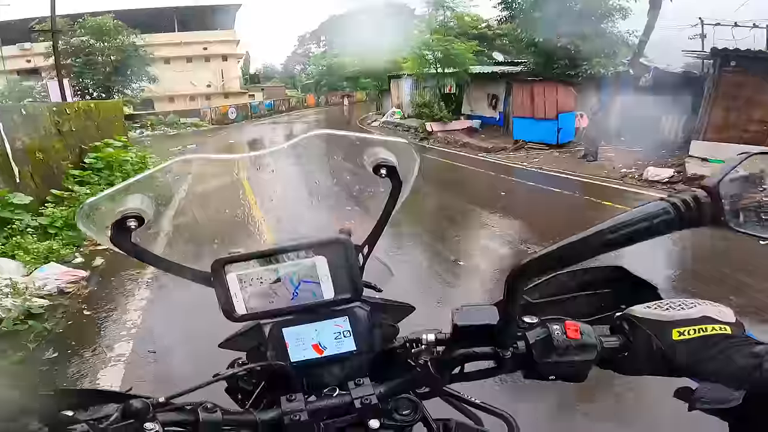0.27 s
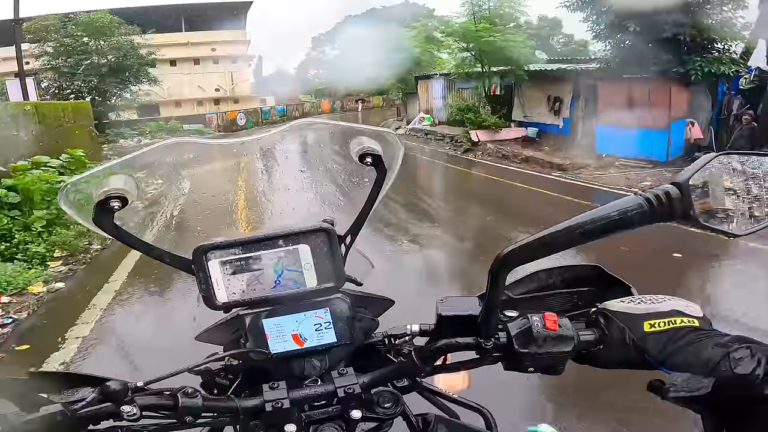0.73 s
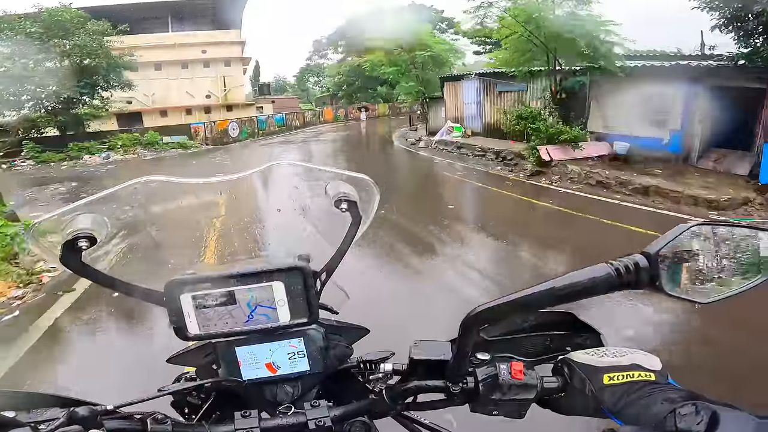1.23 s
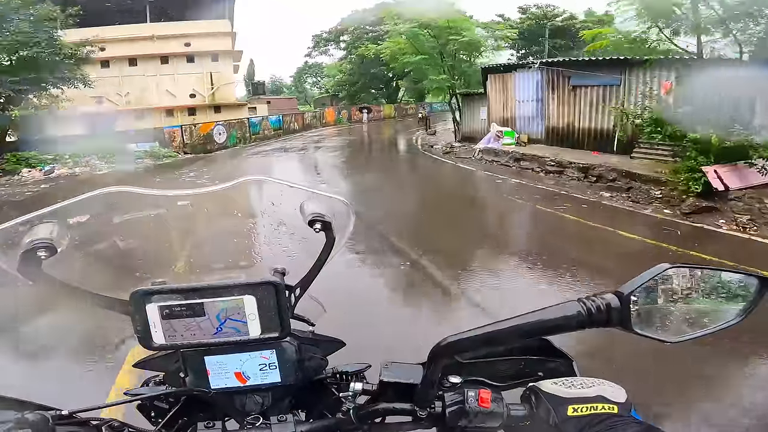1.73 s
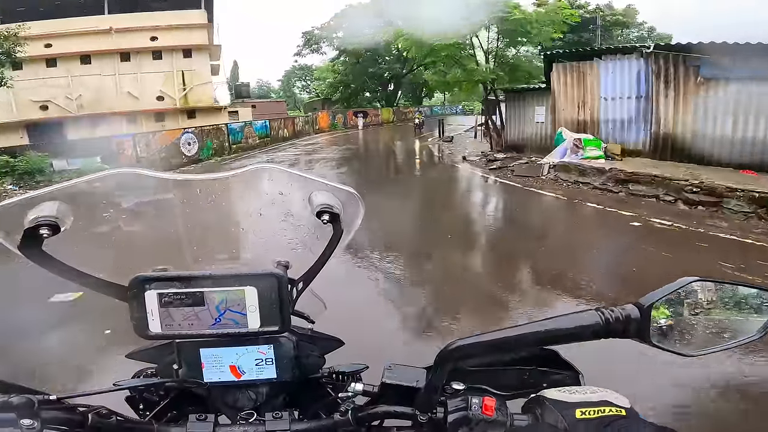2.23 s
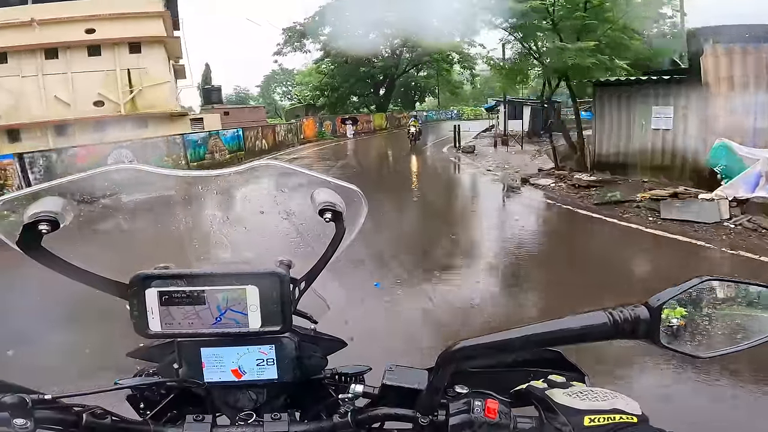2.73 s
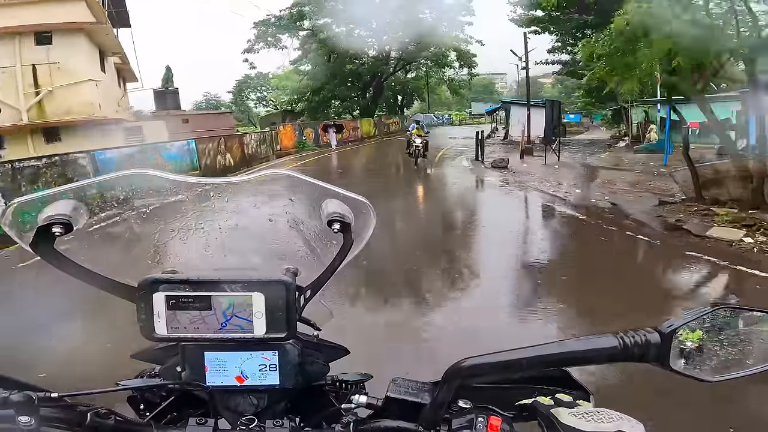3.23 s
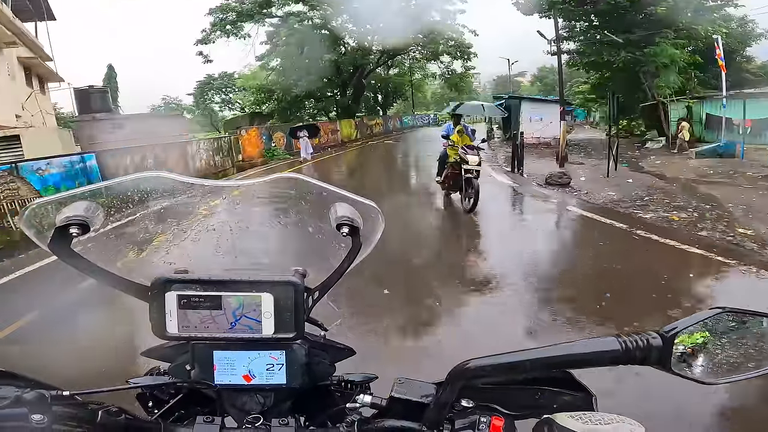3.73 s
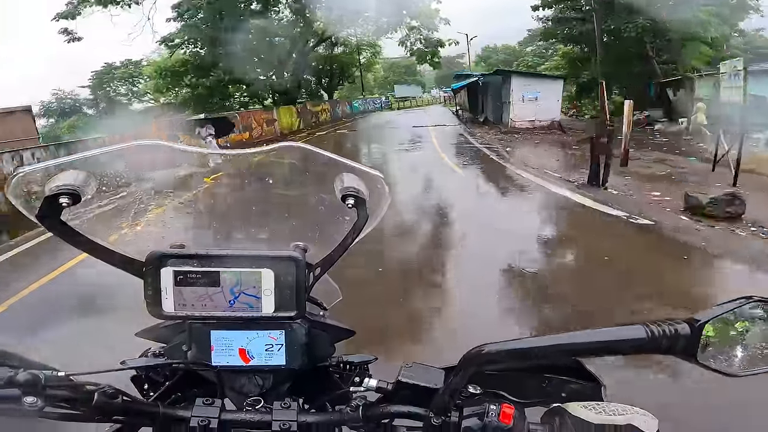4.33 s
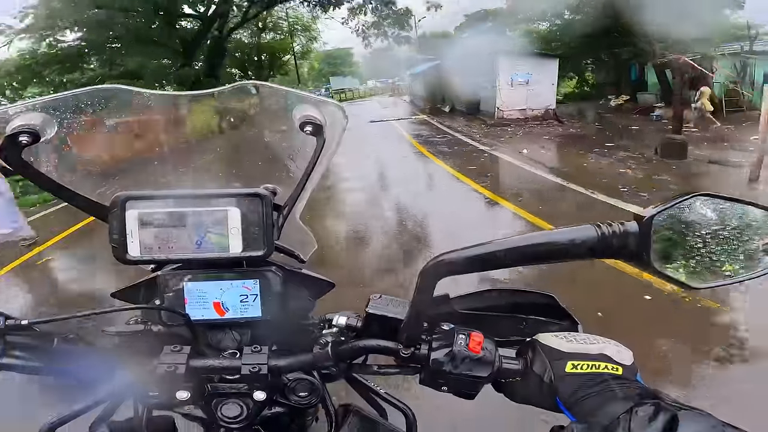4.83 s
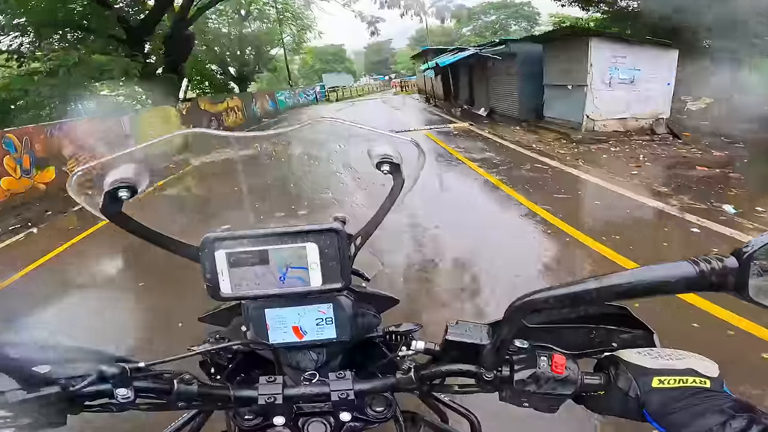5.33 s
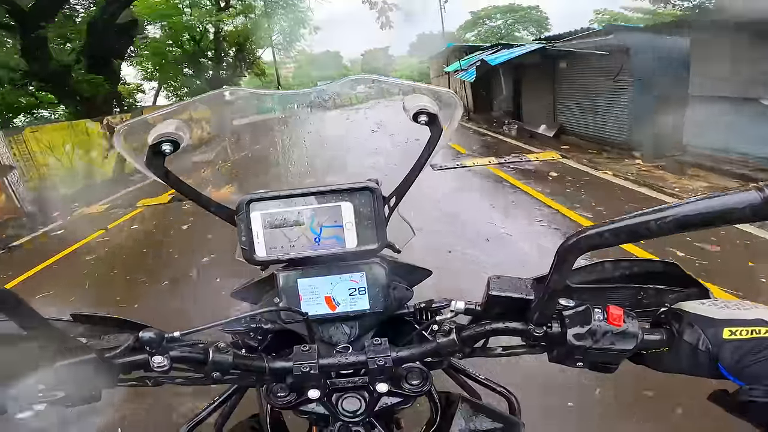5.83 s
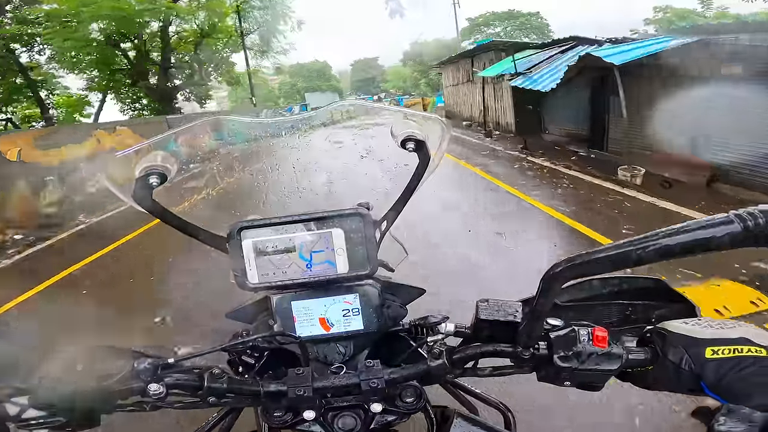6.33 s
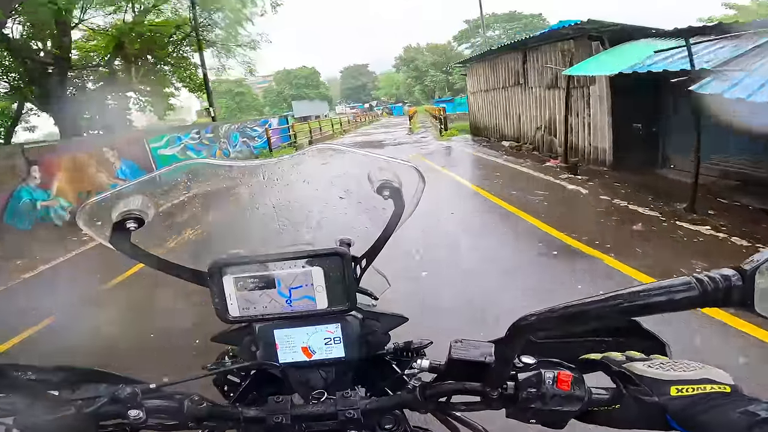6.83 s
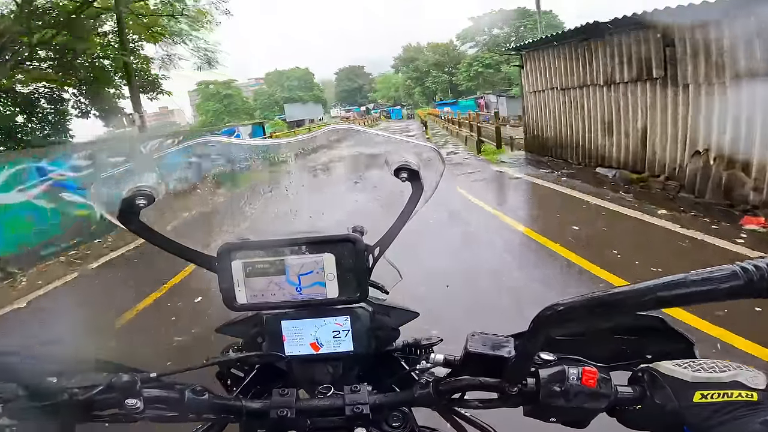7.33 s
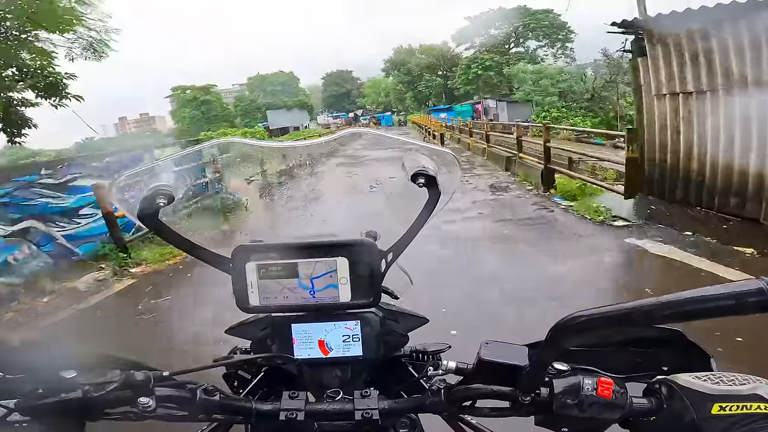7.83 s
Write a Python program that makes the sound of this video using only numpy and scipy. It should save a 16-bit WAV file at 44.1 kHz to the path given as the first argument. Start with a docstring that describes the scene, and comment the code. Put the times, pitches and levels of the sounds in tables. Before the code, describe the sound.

Buffeting wind and a low throbbing motorcycle engine dominate, with sharp raindrop taps, thin wet tyre spray and brief throttle growls.

```python
"""A motorcycle ride in light rain

A single-cylinder motorcycle rides at town speed along a wet road, heard from the rider's chest.
Wind is shaped noise in gusts, with booming sines for thumps in the microphone port; the engine is noise
and firing kicks through resonances, with clatter and throttle growl. The tyres are hissing noise and tiny
clicks; raindrops and a rumble strip are clicks that set small parts ringing."""
import sys
import numpy as np
from scipy import signal
from scipy.fft import rfft, irfft, next_fast_len
from scipy.io import wavfile
from scipy.ndimage import uniform_filter1d

SR = 44100
rng = np.random.default_rng(int(sys.argv[2]) if len(sys.argv) > 2 else 0)


def dump_mix(stems):
    """Bounce the given channels to the path in sys.argv[1] as a 16-bit WAV at rate SR."""
    frames = np.atleast_2d(stems).T  # one column per channel
    limited = np.clip(frames, -1, 1)  # hard clip at full scale
    pcm = np.round(limited * 32767).astype(np.int16)
    wavfile.write(sys.argv[1], SR, pcm)


N = 356680
TIME = np.arange(N) / SR  # seconds


def from_db(db):
    """Decibels to gain."""
    return 10 ** (np.asarray(db) / 20)


def rms_one(x):
    """Scale to unit power."""
    return x / np.sqrt(np.mean(x ** 2) + 1e-20)


def in_time(rows):
    """Draw each column of a curve table as a line through time."""
    s, *columns = np.transpose(rows)
    return [np.interp(TIME, s, column) for column in columns]


def coloured(x, spectrum, resonances=()):
    """Give a steady sound a spectrum with resonant bumps or dips, at unit power."""
    size = next_fast_len(N)
    hz = np.maximum(np.arange(size // 2 + 1) * SR / size, 1)
    points, levels = np.transpose(spectrum)
    db = np.interp(np.log(hz), np.log(points), levels, left=-120, right=-120)
    for centre, width, lift in resonances:
        db = db + lift / (1 + (2 * (hz - centre) / width) ** 2)
    return rms_one(irfft(rfft(x, size) * from_db(db), size)[:N])


def drift(rate):
    """Wander by chance with spread 1, heading for a new value `rate` times a second."""
    knots = rng.standard_normal(4096)
    return rms_one(np.interp(TIME * rate, np.arange(len(knots)), knots))


def evened(x, seconds):
    """Hold a noise at unit power over spans of this length."""
    power = uniform_filter1d(x ** 2, max(int(seconds * SR), 2))
    return x / np.sqrt(np.maximum(power, 0) + 1e-9)


def band_noise(order, low_hz, high_hz, x):
    """Keep only the part of a sound between two pitches."""
    return signal.sosfilt(signal.butter(order, [low_hz, high_hz], "band", fs=SR, output="sos"), x)


def ring(clicks, hz, t60):
    """A unit click sets a sine of height about 1 ringing; it falls by 60 dB in t60 seconds."""
    decay, step = from_db(-60 / (t60 * SR)), 2 * np.pi * hz / SR
    return signal.lfilter([0, np.sin(step)], [1, -2 * decay * np.cos(step), decay * decay], clicks + 1e-18)


def grains(per_s, spread_db):
    """Random clicks of uneven size and sign."""
    chance, size = rng.random((2, N))
    born = np.flatnonzero(chance < per_s / SR)
    out = np.zeros(N)
    out[born] = from_db(spread_db * np.minimum(-np.log(size[born]), 4)) * (-1) ** born
    return out


def add(out, s, sound):
    """Mix a short sound in at time s."""
    start = max(round(s * SR), 0)
    out[start:start + len(sound)] += sound[:max(N - start, 0)]


def held(rows, rise_s, fall_s):
    """Summed gain of events that swell up to their start, hold, and die away."""
    gain = 0
    for s, length, db in rows:
        before = np.minimum(TIME - s, 0) / rise_s
        after = np.maximum(TIME - s - length, 0) / fall_s
        gain = gain + from_db(db) * np.exp(before - after)
    return gain


def wavering(x, sway_s=.0005, per_s=6):
    """Small wandering delays let the resonances of a sound waver in pitch."""
    return np.interp(TIME - sway_s * drift(rate=per_s), TIME, x)


def patchy(x, low_hz, high_hz, patchy_db, count=6):
    """Let each slice of the spectrum flicker on its own."""
    out, rest = 0, x
    for edge in np.geomspace(low_hz, high_hz, num=count):
        low = signal.sosfiltfilt(signal.butter(3, edge, fs=SR, output="sos"), rest)
        out, rest = out + low * from_db(patchy_db * drift(rate=75)), rest - low
    return out + rest * from_db(patchy_db * drift(rate=83))


def damped(x, cut_hz=2520):
    """The soft wet housing passes little above its ring."""
    return signal.sosfilt(signal.butter(4, cut_hz, fs=SR, output="sos"), x)


def struck(modes, hz, stretch=1, lowest_hz=850, uneven_db=3.5):
    """A blow rings a small part at multiples of its pitch, each of chance strength, with little bass."""
    blow = TIME[:SR // 14] == 0
    rings = 0
    for ratio, db, t60 in modes:
        strength = from_db(db + uneven_db * rng.uniform(-1.4, 1))
        rings = rings + strength * ring(blow, hz * ratio, t60 * stretch)
    return signal.sosfilt(signal.butter(2, lowest_hz, "high", fs=SR, output="sos"), damped(rings))


def splashed(bursts):
    """Bright band of a bursting drop, with a brief ring of the water film."""
    film = from_db(-35) * ring(bursts, hz=4400, t60=.0018)
    return band_noise(1, 2700, 5200, bursts + 1e-18) + film


# headwind at the microphone: time_s, above_usual_db
HEADWIND = [(0, -17.5), (.4, -3.5), (1.7, -1.5), (2.3, 1.5), (2.9, 0.5), (3.75, -6), (4.08, -3.5),
            (4.25, -0.5), (5.45, 2.5), (5.95, -1.5), (7.0, 1), (7.5, 3.5), (8.0, 4.5)]
# gusts: peak_s, length_s, swell_lift_db, rumble_lift_db, flutter_lift_db
GUSTS = [(0.666, 0.28, 5.5, 6.5, 0), (1.11, 0.28, 9.5, 1, -2.5), (2.144, 0.52, 2.5, 3, 3.5),
         (2.473, 0.075, 7, 6, -2.5), (2.637, 0.14, 1, 4.5, -2.5), (2.82, 0.11, -10, 1, 3),
         (3.006, 0.38, 6, 1.5, 2), (3.61, 0.29, 8, -0.5, 4), (4.192, .12, 6, 5.5, 5), (4.32, 0.13, 0, 6, 5),
         (4.65, 0.55, 9, 2, 1.5), (5.264, 0.27, 9.5, -3, -0.5), (5.623, 0.34, 5.5, 2, 2.5),
         (6.35, 0.23, 9, 2.5, 2.5), (6.58, 0.21, 6.5, 4, 5), (7.17, .08, -6, 0, 3.5),
         (7.265, .1, 7, 5.5, -7), (7.484, 0.18, -14, 11, 1), (7.656, 0.23, -6, 8, 1.5),
         (7.94, 0.16, 7.5, 4, 0)]
# eddies from large to small: level in the usual headwind, and share of the headwind's swing they follow
SWAY_DB, SWAY_FOLLOWS = -14.0, 0.26
SWELL_DB, SWELL_FOLLOWS = -22, 0.21
RUMBLE_DB, RUMBLE_FOLLOWS = -26.5, 0.52
FLUTTER_DB = -28.5  # follows it fully


def eddy_levels():
    """All eddies follow the headwind; each gust moves all but the sway in a smooth arch."""
    headwind_db, = in_time(HEADWIND)
    lift_db = np.zeros((3, N))
    for s, length, *lifts_db in GUSTS:
        arch = np.cos(np.pi * np.clip((TIME - s) / length, -.5, .5))
        lift_db += np.outer(lifts_db, arch)
    swell_lift_db, rumble_lift_db, flutter_lift_db = lift_db
    return (SWAY_DB + SWAY_FOLLOWS * headwind_db,
            SWELL_DB + SWELL_FOLLOWS * headwind_db + swell_lift_db,
            RUMBLE_DB + RUMBLE_FOLLOWS * headwind_db + rumble_lift_db,
            FLUTTER_DB + headwind_db + flutter_lift_db)


# wind spectra, slowest to fastest: pitch_hz, relative_level_db
SWAY = [(2, -9.5), (8, 1), (14, -5.5), (22, -18.5), (40, -63)]
SWELL = [(12, 2), (19, 3), (28, -6.5), (40, -8), (52, -12), (100, -33)]
RUMBLE = [(25, -23), (42, -6), (54, 4), (68, -0.5), (100, -1.5), (125, -4), (160, -9.5), (260, -33)]
FLUTTER = [(80, -35), (130, -4), (190, 0), (240, -1.5), (300, -7.5), (350, -12), (440, -18.5), (800, -38),
           (2000, -59)]


def wind(sway_db, swell_db, rumble_db, flutter_db, lumpy_db=2.5, eddy_share=0.44, surge_db=1.5):
    """Large eddies sway the pressure, middling ones rumble, small ones flutter in the port as puffs."""
    sway = evened(coloured(rng.standard_normal(N), SWAY), seconds=0.14)
    swell = evened(coloured(rng.standard_normal(N), SWELL), seconds=0.172)
    rumble = evened(coloured(rng.standard_normal(N), RUMBLE), seconds=0.071)
    flow = rng.standard_normal(N) + eddy_share * rms_one(grains(per_s=90, spread_db=0.5))
    lumpy_flow = flow * from_db(lumpy_db * drift(rate=49))
    flutter = evened(coloured(lumpy_flow, FLUTTER), seconds=.1)
    surge = from_db(surge_db * drift(rate=7))
    slow = from_db(sway_db) * sway + from_db(swell_db) * swell
    return slow + surge * (from_db(rumble_db) * rumble + from_db(flutter_db) * flutter)


# spectrum of the exhaust drone: pitch_hz, relative_level_db
DRONE = [(100, -2), (250, -3.5), (325, 0.5), (390, -0.5), (470, -1), (650, -4), (800, -5), (930, -6),
         (1120, -7.5), (1270, -11.5), (1400, -15.5), (1700, -24.5), (3000, -48)]
# resonances and notches of silencer and crankcase: pitch_hz, width_hz, lift_db
BODY = [(311, 63, -7), (400, 110, 1), (501, 36, -2.5), (569, 60, 5.5), (715, 47, 3.5), (785, 48, 3),
        (902, 36, 1.5), (966, 43, -2), (1239, 49, 6)]


def exhaust_drone(exhaust, throb, pulse_share=0.52):
    """Firing pulses and throbbing gas noise sound through the resonances of the engine's body."""
    gas = pulse_share * exhaust + throb * rng.standard_normal(N)
    return wavering(evened(coloured(gas, DRONE, BODY), seconds=0.096))


# exhaust hum at cruising load: multiple_of_firing_rate, level_db
HUM = [(2, -35.5), (3, -42), (4, -35), (5, -46.5), (7, -45), (8, -49.5)]


def exhaust_hum(cycle):
    """Pure tones at multiples of the firing rate."""
    return sum(from_db(db) * np.sin(2 * np.pi * order * cycle) for order, db in HUM)


# spectrum of valves and chain: pitch_hz, relative_level_db
CLATTER = [(1000, -29), (1420, -2), (1540, -4), (1730, 4), (2050, 2.5), (2200, -1), (2370, 1), (2500, -4),
           (2750, -8.5), (3300, -12), (4300, -19.5), (6500, -38)]


def clatter(throb):
    """Valves and chain make throbbing noise and uneven ticks, flickering across the spectrum."""
    ticking = rng.standard_normal(N) + .5 * rms_one(grains(per_s=300, spread_db=3.0))
    return rms_one(patchy(coloured(throb * ticking, CLATTER), low_hz=1480, high_hz=3180, patchy_db=4.0))


# spectrum of the air intake: pitch_hz, relative_level_db
INTAKE = [(250, 0.5), (400, 5.5), (520, -6.5), (650, -4.5), (900, -8), (1100, -13), (1250, -15),
          (1450, -21.5), (1900, -21), (2400, -22.5), (3500, -66)]
# resonances of the airbox: pitch_hz, width_hz, lift_db
AIRBOX = [(390, 100, -1.5), (588, 71, 12.5), (735, 53, 3.5), (1240, 43, 8.5)]
# twists of the throttle, also played by growl(): start_s, hold_s, rush_db, growl_db, growl_hz,
# growl_width_hz, upper_ring_db, low_bark_db, low_bark_hz
THROTTLE = [(.44, 0.33, -47, -50, 1075, 90, -59, -44.5, 458),
            (2.05, .29, -35, -41, 1070, 130, -44, -44, 400),
            (4.26, .27, -42.5, -40, 1102, 105, -49, -46, 405),
            (6.55, .12, -35, -38, 1068, 44, -44, -38, 460),
            (7.79, 0.24, -37, -36.5, 1105, 62, -43, -35, 410)]


def intake_rush(gulps, drone_db, rest_db=-12.5):
    """Air rushes through the airbox, a set step below the load's level, and more with each throttle twist."""
    twists = held([row[:3] for row in THROTTLE], rise_s=0.06, fall_s=0.074)
    gain = from_db(drone_db + rest_db) + twists
    return gain * evened(coloured(gulps, INTAKE, AIRBOX), seconds=0.06)


# engine speed: time_s, firings_per_s
FIRING = [(0, 20.1), (.5, 20.2), (1.3, 26), (2.2, 27.2), (3, 26.3), (4, 23.5), (5, 30.3), (5.8, 28.5),
          (6.5, 27.5), (7.2, 26.2), (8.1, 30.8)]
# depth of the throb of the four strokes: time_s, share
STROKE_THROB = [(0, .2), (5.1, 0.33), (5.75, 0.42), (6.45, 0.29), (7.0, 0.22)]
CRUISE_DB = -35  # load level when cruising
HUM_FOLLOWS = 0.21  # share of the load's swing in the exhaust hum


def engine(drone_db, clatter_db, gulp_share=0.43, uneven_db=2.0, firing_throb=0.13):
    """Each firing kicks the body resonances; gas and gear noise throb with firing and its four strokes."""
    firing_hz, = in_time(FIRING)
    stroke_throb, = in_time(STROKE_THROB)
    cycle = np.cumsum(firing_hz * (1 + .005 * drift(rate=10))) / SR
    kicks = np.diff(np.floor(cycle), prepend=0) * from_db(uneven_db * rng.standard_normal(N))
    strokes = np.cos(8 * np.pi * cycle)
    throb = 1 + firing_throb * np.cos(2 * np.pi * cycle) + stroke_throb * strokes
    # the pipe smears every kick over some tens of milliseconds
    t = TIME[:SR // 8]
    pipe = rng.standard_normal(len(t)) * np.exp(-t / 0.032)
    exhaust = rms_one(signal.fftconvolve(kicks, pipe)[:N])
    # the cylinder gulps air 1/60 s after each exhaust pulse
    gulps = gulp_share * np.roll(exhaust, SR // 60) + throb * rng.standard_normal(N)
    out = from_db(drone_db + 1.5) * exhaust_drone(exhaust, throb)
    out = out + from_db(HUM_FOLLOWS * (drone_db - CRUISE_DB)) * exhaust_hum(cycle)
    out = out + from_db(clatter_db) * clatter(throb)
    return out + intake_rush(gulps, drone_db) + growl(gulps)


def spatter(spray_db, per_s=130, level_db=14, spread_db=3.2, clump_db=1.0):
    """Droplets flung from the tyre tick on the bodywork in clumps, louder on a wetter road."""
    ticks = band_noise(1, 2000, 7500, grains(per_s, spread_db) + 1e-18)
    return from_db(spray_db + level_db + clump_db * drift(rate=29)) * ticks


# tyre spray, following the wetness of the road: time_s, level_db
ROAD = [(0, -75.5), (.5, -68), (1.4, -62.5), (2.15, -58), (2.7, -63.5), (3.4, -66), (4.05, -64),
        (4.25, -59.5), (4.46, -61), (4.6, -65), (5.35, -61.5), (6.42, -67.5), (6.6, -61.5), (7.2, -64.5),
        (7.85, -60.5), (8.09, -63)]
# puddles: start_s, hold_s, slosh_db
PUDDLES = [(.86, 0.37, -62), (4.24, 0.22, -74), (4.78, 0.055, -67), (7.6, 0.45, -73)]
# spectra of plain spray, fine mist and coarse slosh: pitch_hz, relative_level_db
SPRAY = [(2000, 0.5), (4000, 0), (5500, -4), (7000, 1.5), (8400, -3), (9000, -2.5), (10100, 2.5),
         (11300, -2), (13500, -7), (15400, -12)]
MIST = [(4000, -23), (6000, -1), (7300, 1.5), (8400, 6), (9000, -3), (10200, -2.5), (12000, -11),
        (15400, -12)]
SLOSH = [(2500, 3.5), (3700, -3), (4500, -6.5), (5100, -6.5), (5500, -5.5), (6000, -8.5), (7200, -18),
         (9500, -8.5), (11300, -22), (13600, -16), (15400, -24)]


def water_noise(spectrum, fizz_share=0.65):
    """Steady noise and many tiny clicks make the fizz of torn water."""
    fizz = rms_one(grains(per_s=1200, spread_db=3.0))
    return coloured(rng.standard_normal(N) + fizz_share * fizz, spectrum)


def tyres(mist_share=0.41, film_slosh_db=-0.5, flutter_db=1.7):
    """The tread tears the water film into spray and fine mist, with a coarser slosh that swells in puddles."""
    spray_db, = in_time(ROAD)
    # some slosh follows the spray even between puddles
    slosh_gain = from_db(spray_db + film_slosh_db) + held(PUDDLES, rise_s=0.069, fall_s=0.045)
    hiss = np.sqrt(1 - mist_share) * water_noise(SPRAY) + np.sqrt(mist_share) * water_noise(MIST)
    water = from_db(spray_db) * hiss + slosh_gain * water_noise(SLOSH) + spatter(spray_db)
    return patchy(water, low_hz=3020, high_hz=11000, patchy_db=2.0) * from_db(flutter_db * drift(rate=110))


def drizzle(rush_db, per_s=3.3, level_db=-1.0, ring_t60=0.0095, splash_db=-7.0):
    """Smaller drops patter and splash at random on spots of different pitch, louder under engine load."""
    spots = np.geomspace(1450, 2600, num=7)  # Hz
    hits = [grains(per_s, spread_db=3.0) for _ in spots]  # per_s drops on each spot
    patter = sum(ring(clicks, hz, ring_t60) for clicks, hz in zip(hits, spots))
    splashes = splashed(sum(hits))
    return from_db(rush_db) * (from_db(level_db) * damped(patter) + from_db(splash_db) * splashes)


# raindrops on the housing: start_s, knock_db, pitch_hz, splash_db (before a shared lift), ring_time_multiple
DROPS = [(0.393, -34, 2030, -52, .8), (.504, -39.5, 2000, -58, 1), (0.7083, -31.5, 1670, -59, 1.2),
         (.776, -32.5, 1800, -58, 1), (0.9878, -29, 2070, -58, .8), (1.056, -30.5, 1900, -55, 1),
         (1.14, -28.5, 2020, -58, 1), (1.197, -30, 1520, -45, 1), (1.243, -33, 1900, -55, 1),
         (1.381, -35, 2090, -52, 1), (1.455, -27, 1700, -47, 1.2), (1.555, -35, 1900, -54, 1),
         (1.645, -29, 2120, -49, 1), (1.845, -30, 2250, -48, 1), (1.8638, -25.5, 1970, -47, 1.3),
         (1.9, -33, 1900, -54, 1), (2.044, -24.5, 1390, -59, 1), (2.127, -28, 1690, -56, 1),
         (2.367, -30.5, 1940, -50, 1), (2.458, -31, 1900, -50, 1), (2.614, -36, 1910, -52, 1),
         (2.8166, -30.5, 1750, -51, 1.2), (2.869, -33, 2010, -49, 1.2), (2.959, -32.5, 1760, -43, 1.2),
         (3.081, -35, 1750, -52, 1), (3.1089, -24.5, 1480, -43, 1.7), (3.194, -35.5, 2320, -49, 1),
         (3.253, -40, 1800, -58, .8), (3.266, -38, 2500, -48, .8), (3.2712, -28, 1820, -52, 1.3),
         (3.283, -41, 2100, -51, 1), (3.383, -44, 2200, -53, .8), (3.411, -29.5, 2030, -53, .55),
         (3.443, -37, 1980, -58, 1.2), (3.529, -40, 2400, -53, 1), (3.538, -28.5, 1680, -48, 1.7),
         (3.625, -40, 1890, -54, 1), (3.71, -36, 1880, -56, 1), (3.732, -38, 1900, -50, 1),
         (3.795, -38, 1900, -52, 1), (3.933, -45, 1700, -58, 1), (3.954, -35, 1900, -59, 1),
         (3.983, -38, 2000, -59, 1), (4.207, -34, 1900, -54, 1), (4.238, -36, 2370, -46, 1),
         (4.356, -34, 2300, -51, 1), (4.544, -32, 1900, -53, 1), (4.806, -33, 2620, -43, 1),
         (4.813, -32, 2300, -40, 1), (4.869, -38, 1910, -39, 1), (4.898, -34, 1900, -52, 1),
         (5.095, -33, 1900, -53, 1), (5.151, -25, 2650, -40, .9), (5.179, -36, 2400, -49, .8),
         (5.198, -29, 1450, -46, 1.2), (5.2433, -25, 1949, -44, 1.2), (5.2647, -35, 1840, -44, 1),
         (5.3425, -35, 1690, -42, 1), (5.358, -29, 1700, -47, 1), (5.434, -31, 1980, -52, 1.3),
         (5.665, -32, 1900, -52, 1), (5.737, -28, 1920, -43, 1), (5.876, -42, 2000, -54, 1),
         (5.968, -35, 1840, -54, 1), (6.283, -45, 2300, -52, 1), (6.942, -30.5, 2287, -42, 1.8),
         (6.959, -38, 2190, -54, 1.3), (7.233, -36, 2090, -44, 1)]
# ring of the wet housing under a drop: multiple_of_pitch, level_db, t60_s (before the ring time multiple)
HOUSING = [(.62, -1, 0.011), (.84, -8, 0.026), (1, 1.5, 0.0087), (1.04, -16, 0.062), (1.22, -8.5, 0.019),
           (1.5, -11.5, 0.01)]


def raindrops(splash_lift_db=3.0, splash_s=0.0022, snap=4.8, tail_s=.007, tail_db=-16):
    """A drop knocks on the housing, then bursts with a snap into a short bright splash and a fading tail."""
    out, t = np.zeros(N), TIME[:SR // 25]
    fade = np.exp(-t / splash_s) + from_db(tail_db) * np.exp(-t / tail_s)
    for s, db, hz, splash_db, stretch in DROPS:
        burst = snap * (t == 0) + rng.standard_normal(len(t)) * fade
        add(out, s, from_db(db) * struck(HOUSING, hz, stretch))
        add(out, s, from_db(splash_db + splash_lift_db) * splashed(burst))
    return out


UPPER_RING_HZ, UPPER_RING_WIDTH_HZ, BARK_WIDTH_HZ = 1243, 48, 50
GROWL_OPEN_S, GROWL_CLOSE_S = .032, 0.078


def growl(gulps, steady_s=0.035, wander_s=0.000566, wanders_per_s=17):
    """With the throttle open, gulps of air ring three wandering resonances of the intake tract."""
    out = 0
    for s, length, _, growl_db, growl_hz, width_hz, upper_db, bark_db, bark_hz in THROTTLE:
        resonances = [(growl_db, growl_hz, width_hz),
                      (upper_db, UPPER_RING_HZ, UPPER_RING_WIDTH_HZ),
                      (bark_db, bark_hz, BARK_WIDTH_HZ)]
        for level_db, centre, width in resonances:
            tone = evened(band_noise(2, centre - width / 2, centre + width / 2, gulps), steady_s)
            out = out + tone * held([(s, length, level_db)], GROWL_OPEN_S, GROWL_CLOSE_S)
    return wavering(out, wander_s, wanders_per_s)


# eddies hitting the microphone port: start_s, level_db and overtone_db (each before a shared shift),
# pitch_hz, t60_s
THUMPS = [(1.155, -15, 163.7, -16, 0.047), (1.3, -16, 272, -7, 0.042), (1.575, -18, 190, -12, 0.03),
          (2.02, -14, 202, -13, .04), (2.185, -12, 235, -8, .04), (2.414, -7.5, 234.5, -13, 0.065),
          (2.7, -13, 242, -11, 0.06), (2.751, -11.5, 195, -7, 0.037), (2.81, -14, 233, -5.5, 0.058),
          (2.93, -12, 279, -9, 0.038), (3.02, -18.5, 202, 1.5, 0.033), (3.258, -13.5, 229, -16, 0.089),
          (3.29, -20, 227, 4, 0.025), (3.364, -6.5, 245, -5.5, 0.029), (4.352, -11, 150, -17, 0.042),
          (4.401, -6, 207, -16, 0.032), (4.653, -5, 189, -9.5, 0.046), (4.683, -8, 198, -8, 0.033),
          (5.095, -9.5, 174, -12, .04), (5.163, -11, 160, -5, .035), (5.268, -9, 232, -5, 0.025),
          (5.447, -10.5, 295, -9, 0.033), (5.625, -9.5, 234, -11, 0.064), (5.705, -10.5, 214, -12, 0.04),
          (5.808, -9.5, 231, -7, .03), (6.225, -10, 231, -6, 0.04), (6.6, -9.5, 205, -9, 0.043),
          (6.97, -9.5, 183, -15, 0.053), (7.201, -7, 208, -9, 0.045), (7.309, -8, 246, -5.5, 0.035),
          (7.505, -6.5, 195, -19, 0.047), (7.961, -8, 190, -1.5, 0.04)]


def thumps(rise_s=0.0032, level_db=3.0, overtone=1.625, puff_db=-5):
    """A strong eddy makes the port boom for a few cycles, with an overtone and a puff of noise."""
    out, t = np.zeros(N), TIME[:SR // 8]
    puffs = from_db(puff_db) * evened(band_noise(3, 300, 620, rng.standard_normal(N)), seconds=0.014)
    for s, db, hz, overtone_db, ring_t60 in THUMPS:
        shape = (1 - np.exp(-t / rise_s)) * from_db(-60 * t / ring_t60)
        boom = np.sin(2 * np.pi * hz * t)
        edge = np.sin(2 * np.pi * overtone * hz * t) + np.roll(puffs, -int(s * SR))[:len(t)]
        add(out, s, from_db(db + level_db) * shape * (boom + from_db(overtone_db - 2.0) * edge))
    return out


# tiny droplets that ping in the water film without a knock: start_s, level_db, pitch_hz
PINGS = [(2.97, -40, 4300), (3.009, -41, 4900), (4.737, -39, 4300), (4.751, -38, 4500), (4.783, -29, 4500),
         (4.869, -37, 4300), (5.122, -45, 7000), (5.138, -37, 9000), (6.585, -38, 4000), (6.86, -37, 8500)]


def pings(burst_s=0.00063, ring_t60=0.0092, ring_db=-12):
    """A tiny droplet bursts and sets a small patch of the water film ringing."""
    out, t = np.zeros(N), TIME[:SR // 25]
    for s, db, hz in PINGS:
        burst = band_noise(2, .9 * hz, 1.5 * hz, rng.standard_normal(len(t)) * np.exp(-t / burst_s))
        add(out, s, from_db(db) * (from_db(ring_db) * ring(t == 0, hz, ring_t60) + burst))
    return out


# front wheel, then rear wheel, over a painted rumble strip: start_s, level_db, pitch_hz
STRIP = [(6.055, -27, 1640), (6.198, -31.5, 1320)]
# ring of a knocked suspension part: multiple_of_pitch, level_db, t60_s
KNOCK = [(.56, -10, .02), (.73, 4.5, 0.026), (1, 1, 0.018), (1.27, 1, .012), (1.5, -0.5, .01),
         (1.8, -15, 0.013)]


def rumble_strip():
    """Each wheel knocks its suspension as it hits the strip."""
    out = np.zeros(N)
    for s, db, hz in STRIP:
        add(out, s, from_db(db) * struck(KNOCK, hz))
    return out


# how hard the engine works: time_s, load_level_db (sets drone, intake, hum and clatter)
LOAD = [(0.02, -49.5), (.3, -42.5), (.6, -38.5), (1.2, -37.5), (1.37, -34.5), (1.55, -36), (1.8, -33.5),
        (2.25, -31), (2.75, -35.5), (3.25, -39), (3.6, -40.5), (4.07, -39), (4.28, -33.5), (4.8, -35.5),
        (5.15, -33.5), (5.5, -32), (6.15, -37), (6.6, -33.5), (7.0, -37), (7.45, -36), (7.82, -30),
        (8.09, -33)]
CLATTER_DB, CLATTER_FOLLOWS = -49.5, 0.95  # level when cruising; share of the load's swing
WAVER_DB, WAVERS_PER_S = 0.82, 9  # the engine's loudness wavers by chance


def scene():
    """Wind, machine, road and rain at one microphone; engine load also sets the drizzle's level."""
    drone_db, = in_time(LOAD)
    clatter_db = CLATTER_DB + CLATTER_FOLLOWS * (drone_db - CRUISE_DB)
    air = wind(*eddy_levels()) + thumps()
    machine = engine(drone_db, clatter_db) * from_db(WAVER_DB * drift(rate=WAVERS_PER_S))
    road = tyres() + rumble_strip()
    rain = drizzle(clatter_db) + raindrops() + pings()
    return (air + machine + road + rain)[None]


def record(dry):
    """The loudest peaks are rounded off and the top is cut steeply at 15500 Hz."""
    rounded = dry / (1 + (dry / .85) ** 8) ** (1 / 8)
    return signal.sosfilt(signal.ellip(10, .1, 80, 15500, fs=SR, output="sos"), rounded)


dry = scene()
out = record(dry)
dump_mix(out)
```